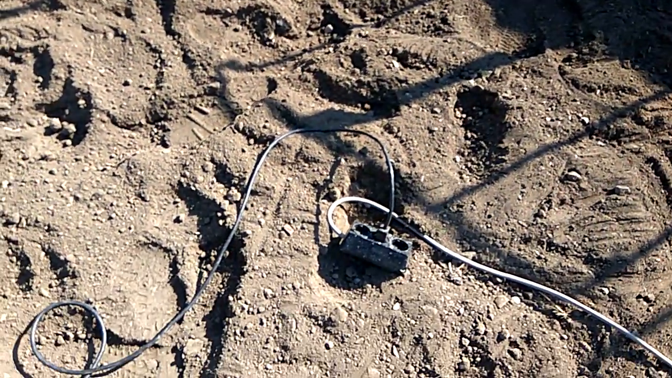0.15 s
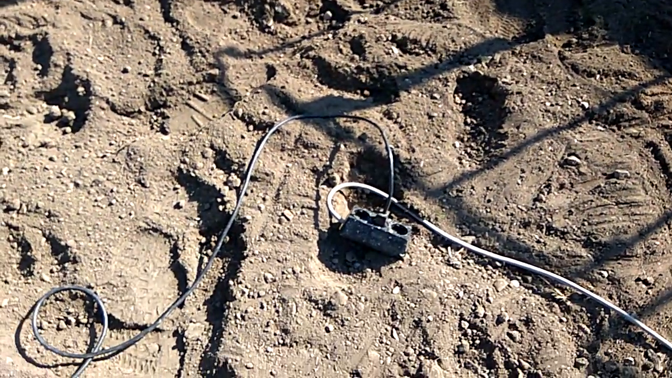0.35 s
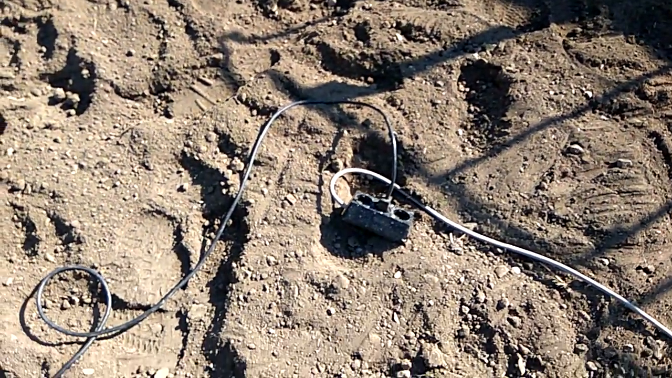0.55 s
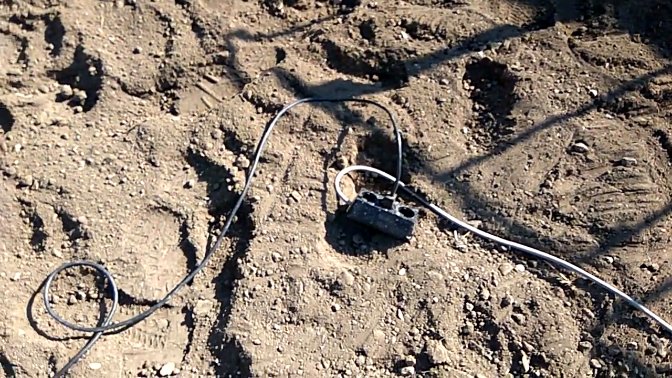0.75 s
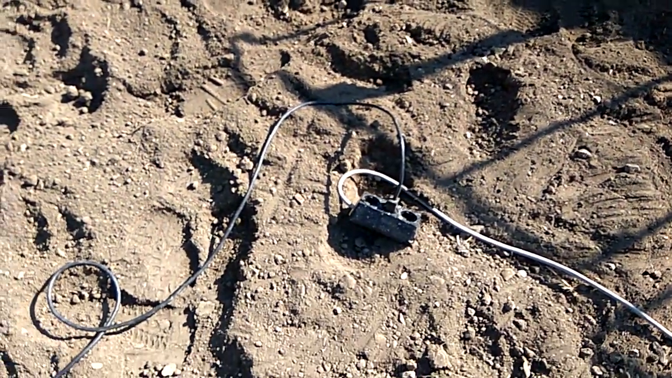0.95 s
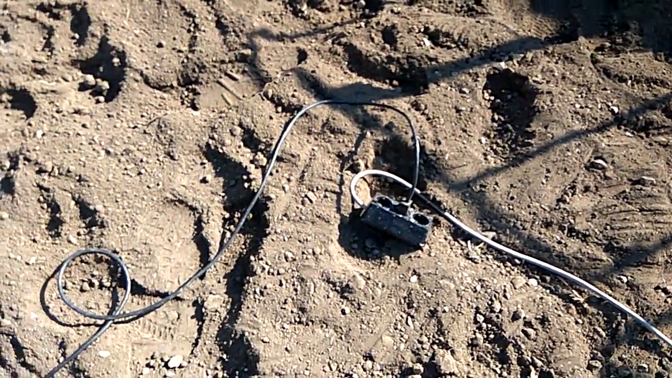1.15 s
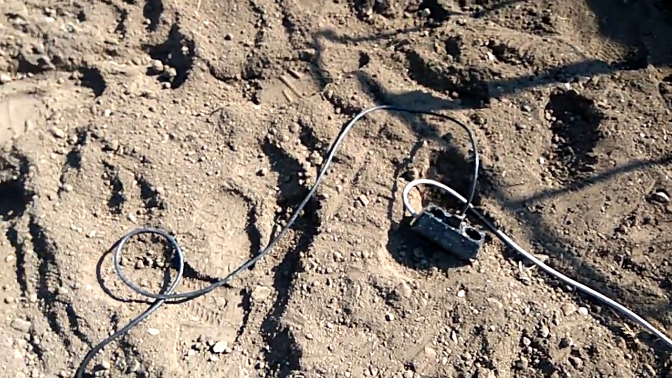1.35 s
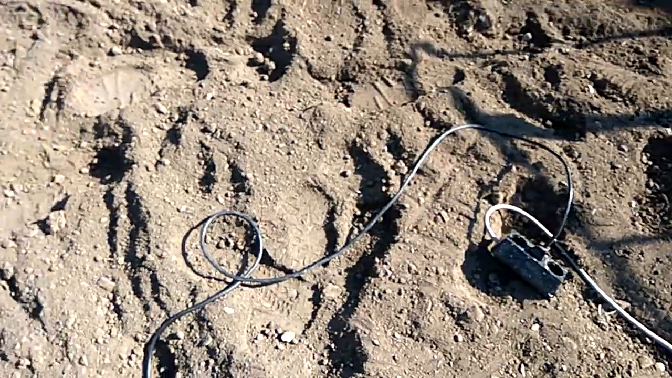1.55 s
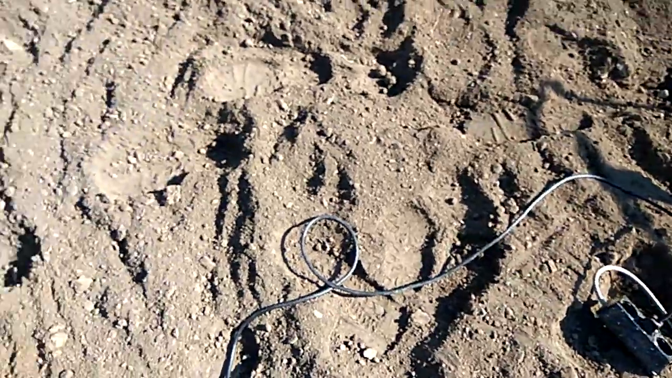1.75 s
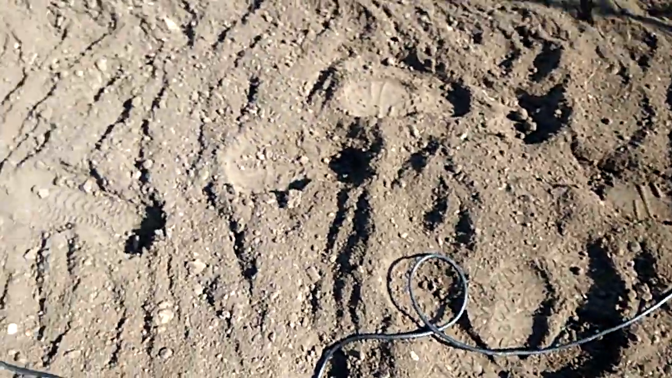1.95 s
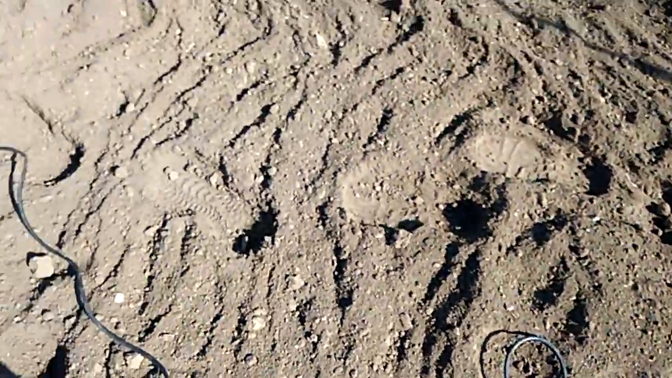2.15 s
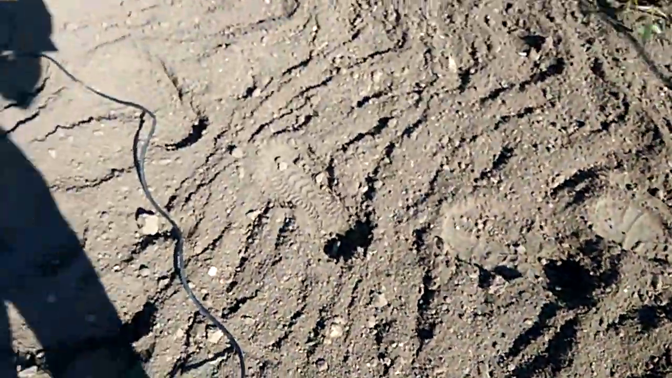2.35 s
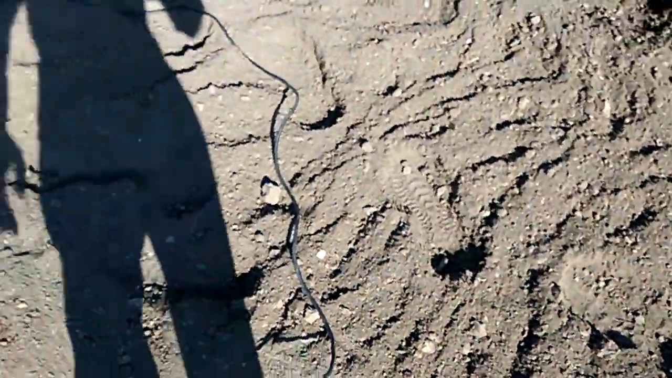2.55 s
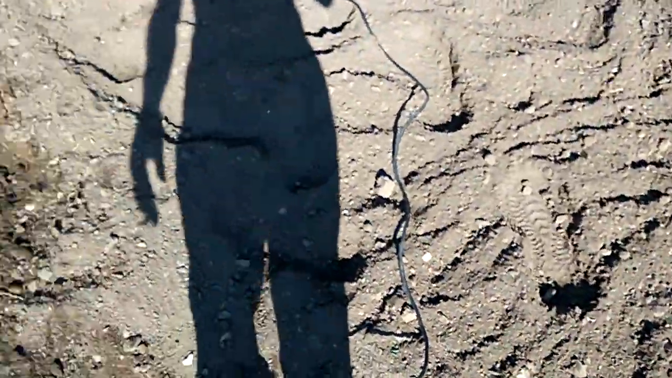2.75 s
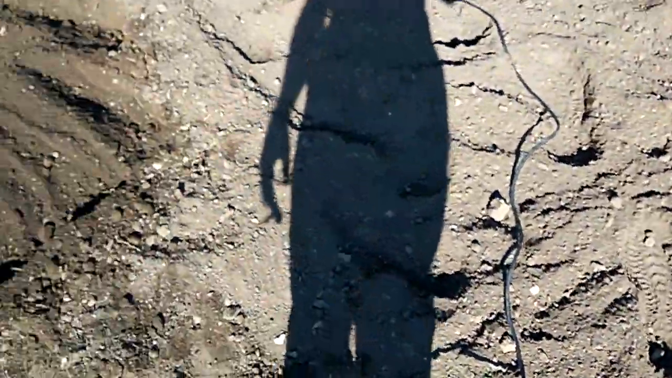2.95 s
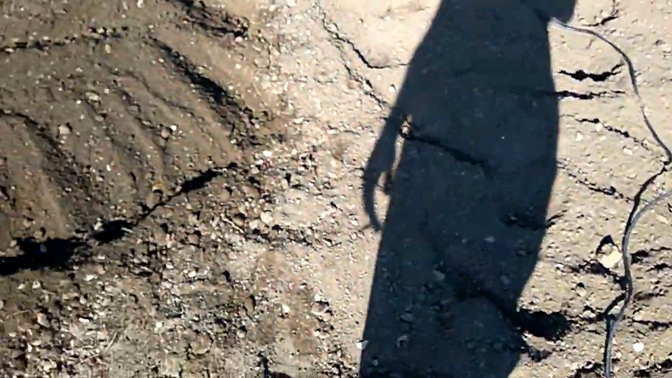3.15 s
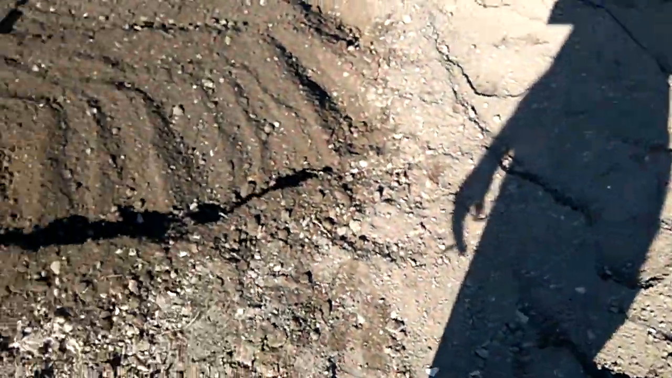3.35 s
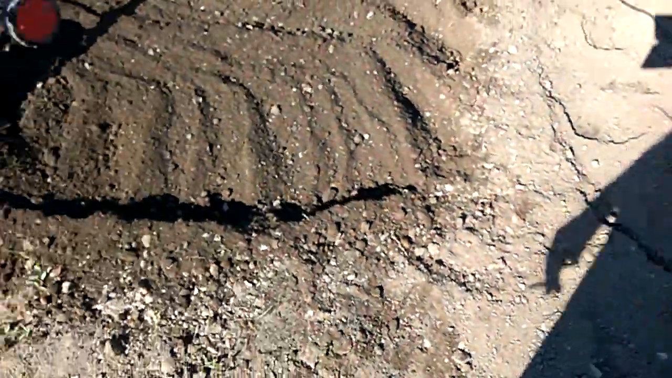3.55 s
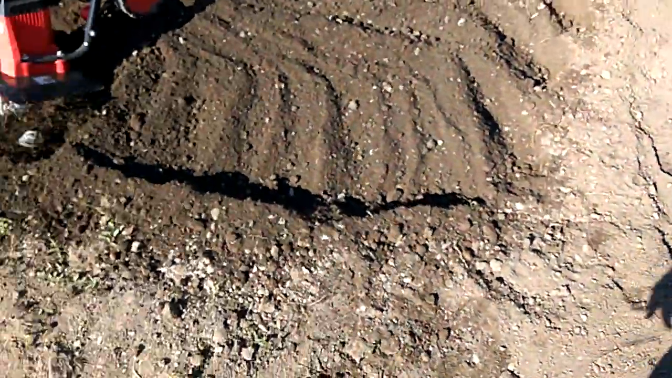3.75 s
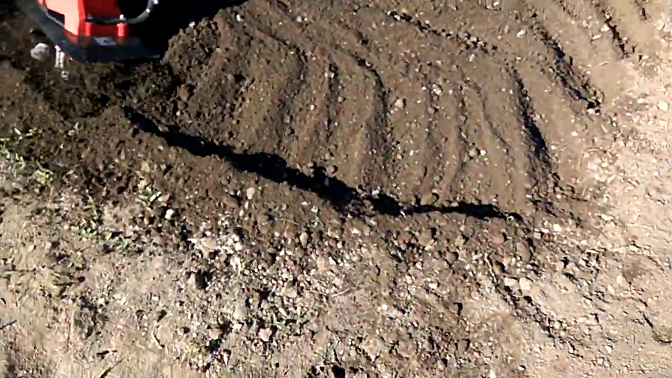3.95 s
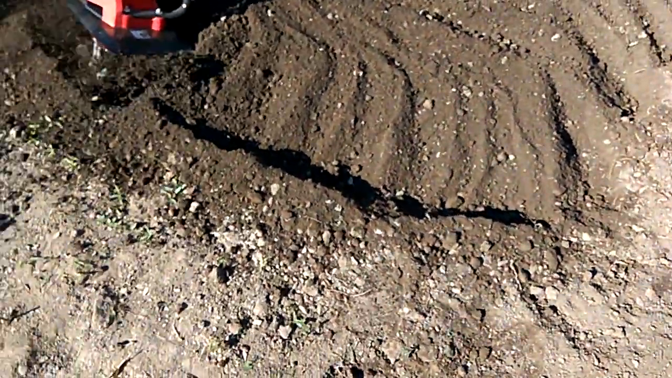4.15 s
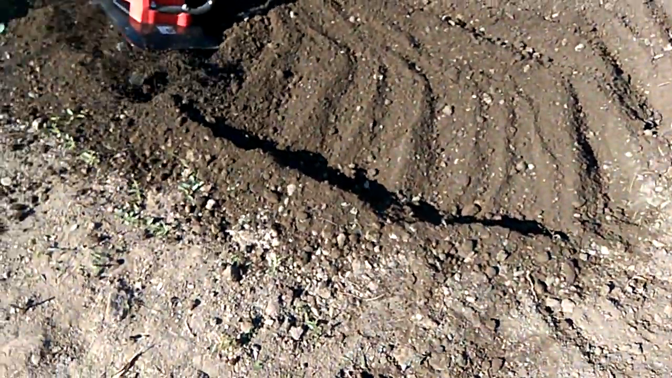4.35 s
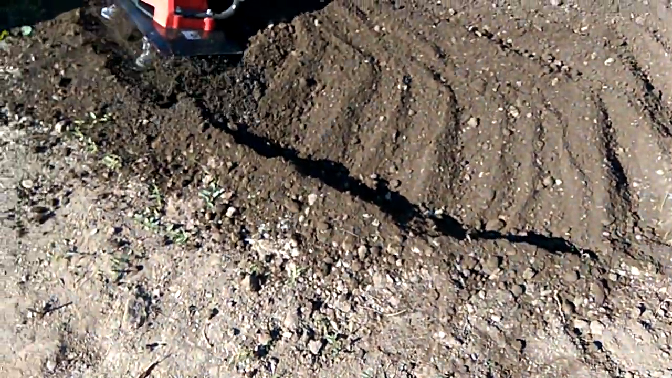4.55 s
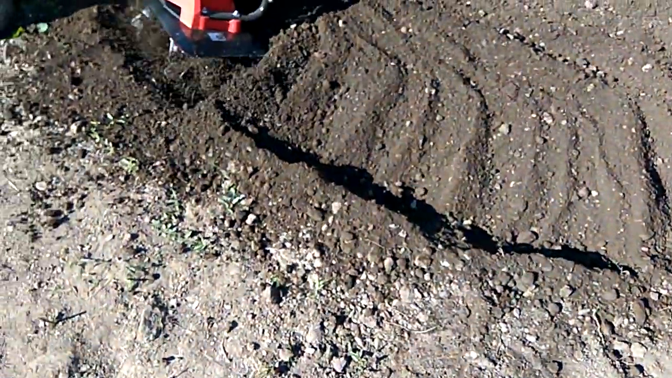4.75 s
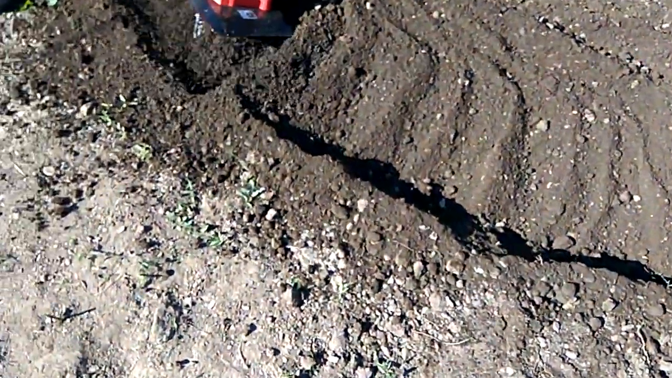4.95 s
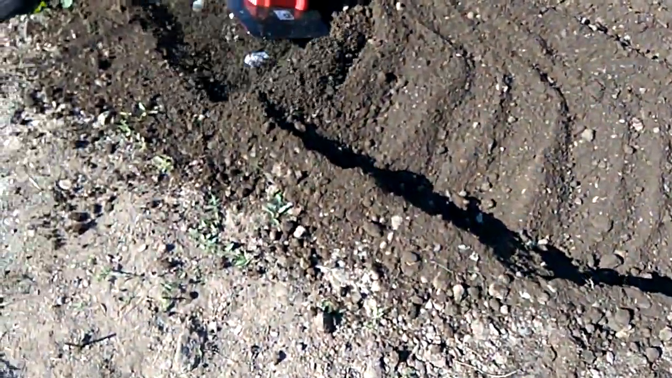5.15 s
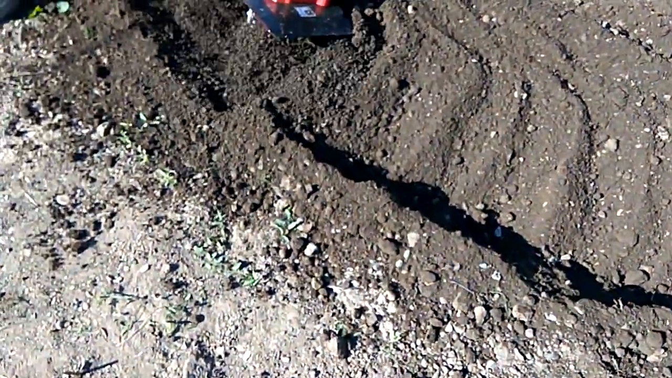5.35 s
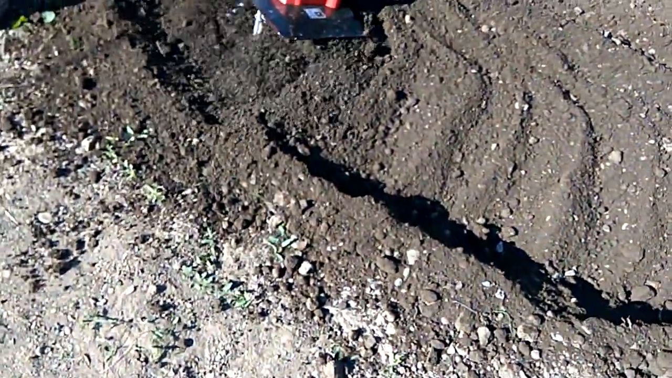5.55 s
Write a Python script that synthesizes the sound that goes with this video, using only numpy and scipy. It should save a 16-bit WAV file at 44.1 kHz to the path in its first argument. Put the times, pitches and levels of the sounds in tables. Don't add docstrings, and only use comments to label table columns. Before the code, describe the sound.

A small electric tiller whines high over a broad rush of air and churned soil, growing louder and fuller as the microphone turns toward it.

```python
import sys
import numpy as np
from scipy import signal
from scipy.fft import rfft, irfft
from scipy.io import wavfile
from scipy.ndimage import uniform_filter1d, map_coordinates

SR = 44100
rng = np.random.default_rng(int(sys.argv[2]) if len(sys.argv) > 2 else 0)


def waveform_to_disk(signal):
    frames = np.transpose(np.atleast_2d(signal))
    scaled = np.clip(frames, -1, 1) * 32767
    samples = np.round(scaled).astype(np.int16)
    wavfile.write(sys.argv[1], SR, samples)


def invert_db(level):
    return 10 ** (np.asarray(level, dtype=float) / 20)


N = 250488

WHEEL = 7 / 29
SIDES = np.array([[.5], [-.5]])
# (time [s], lag behind the right [ms], extra way round the hand [ms], echo level [dB])
PATHS = [(0, -.09, .1, -30), (1.4, -.06, .1, -30), (1.7, 0, .1, -25), (1.9, .24, .12, -6),
         (2.3, .28, .15, -1), (2.5, .33, .17, -1), (2.7, .372, .195, 1.5), (2.9, .39, .225, 2.5),
         (3.1, .375, .285, 5), (3.5, .33, .36, 9), (3.9, .24, .43, 8), (4.1, .21, .45, 6),
         (4.5, .175, .49, 5), (4.9, .15, .525, 3), (5.1, .12, .56, -3), (5.68, .07, .62, -8)]


def unit(x):
    return x / np.sqrt(np.mean(x ** 2) + 1e-20)


def along(points, hz):
    f, v = np.transpose(points)
    return np.interp(np.log(hz + 1), np.log(f + 1), v)


def curves(rows, t=None):
    s, *columns = np.transpose(rows)
    t = np.arange(N) / SR if t is None else t
    return [np.interp(t, s, column) for column in columns]


def wobble(rate, channels=2):
    knots = rng.standard_normal((channels, int(N * 200 / SR) + 9))
    return np.array([map_coordinates(k, [np.arange(N) * rate / SR]) for k in knots])


def patches(shape, size):
    field = uniform_filter1d(rng.standard_normal(shape), size=size[0], axis=-2)
    return unit(uniform_filter1d(field, size=size[1], axis=-1))


def coloured(spectrum, channels):
    hz = np.fft.rfftfreq(N, 1 / SR)
    white = rfft(rng.standard_normal((channels, N)))
    return unit(irfft(white * invert_db(along(spectrum, hz)), N))


def noise(channels):
    return signal.stft(rng.standard_normal((channels, N)), SR, nperseg=512, noverlap=384)


def sound(z):
    return signal.istft(z, SR, nperseg=512, noverlap=384)[1][:, :N]


def garden():
    # (frequency [Hz], level per Hz [dB])
    murmur_spectrum = [(25, -55), (34, -20), (45, -61), (120, -2), (220, 2.5), (320, 3), (450, -2),
                       (700, -3.5), (1100, -5), (1600, -120)]
    # (time [s], pitch [Hz], level [dB])
    engine = [(0, 46, -64), (.7, 44.2, -48), (1.47, 44.1, -44), (1.94, 46.4, -43.5), (2.88, 47.3, -56),
              (3.05, 47.2, -72), (3.27, 47, -43), (3.6, 45, -77), (5.68, 45.5, -93)]
    # (time [s], level [dB], length [s])
    gusts = [
        (.25, -49, 0.28),
        (0.849, -45, 0.21),
    ]
    t = np.arange(N) / SR

    common, *own = coloured(murmur_spectrum, channels=3)
    murmur = common + invert_db(-22) * np.array(own)
    swell_db = 1.5 * wobble(3, channels=1)

    pitch, hum_db = curves(engine)
    phase = 2 * np.pi * np.cumsum(pitch) / SR
    pull_s, rise_s, fade_db_per_s = 2.08, 0.044, 31
    pull = invert_db(-49.5 - fade_db_per_s * abs(t - pull_s)) * np.clip((t - pull_s) / rise_s, 0, 1)
    octave = invert_db(-59) + pull
    hum = invert_db(hum_db + SIDES * wobble(0.82, channels=1) * 1.3) * np.sin(phase) + octave * np.sin(2 * phase)

    wind = coloured([(25, -50), (34, -25), (44, 0), (80, -3), (160, -18), (400, -120)], channels=2)
    breeze = invert_db(-64)
    for s, db, length in gusts:
        breeze = breeze + invert_db(db) * np.exp(-((t - s) / length) ** 2)
    lumps = invert_db(1.3 * wobble(12)) * breeze
    return invert_db(-38.5 + swell_db) * murmur + np.sqrt(2) * hum + lumps * wind


def soil():
    # (time [s], peak level [dB], pitch [Hz])
    thuds = [
        (0.467, -17, 90),
        (2.641, -24, 90),
        (3.099, -16, 92),
        (3.323, -28, 90.6),
    ]
    # (time [s], peak level [dB], left-right difference [dB])
    stones = [
        (0.2209, -22, 9.0),
        (0.9916, -23, 21),
        (2.0986, -22, -8),
        (2.6349, -9, 10),
        (3.0325, -11, 2),
        (3.271, -18, 4),
        (3.3014, -23, 1.5),
        (4.2911, -17, 2.5),
        (4.471, -23, 1.0),
        (4.6078, -20, -19),
    ]
    out, t = np.zeros((2, N + SR)), np.arange(SR // 10) / SR
    for s, db, hz in thuds:
        push = np.sin(2 * np.pi * hz * t) + 0.87 * np.sin(2 * np.pi * 2.3 * hz * t)
        onset = 1 - np.exp(-t / 0.0057)
        out[:, round(s * SR):][:, :len(t)] += invert_db(db - 60 * t / 0.034) * push * onset
    for s, db, pan_db in stones:
        tick = np.diff(rng.standard_normal(len(t) + 1)) * invert_db(-60 * t / 0.027)
        out[:, round(s * SR):][:, :len(t)] += invert_db(db - 15 + SIDES * pan_db) * tick
    return out[:, :N]


def facing(t):
    # (time [s], level [dB])
    roar_level = [(0, -20), (.5, -21), (1, -21.5), (1.4, -22.5), (1.7, -21), (1.9, -19), (2.1, -20.5),
                  (2.3, -18.5), (2.6, -16.5), (2.8, -17), (3.2, -13), (3.5, -13), (3.8, -14), (4.1, -14),
                  (4.5, -14), (4.8, -13.5), (5.1, -13.5), (5.68, -13.5)]
    swing_s, swing_spread_s, away_before, away_after = 2.01, 0.26, 1, 0.25
    shade_s, shade_in_s, shade_out_s, shade_db = 1.887, 0.34, 0.24, -6.5
    clear_before_db, clear_after_db = 0.5, -0.5
    turned = 1 / (1 + np.exp((swing_s - t) / swing_spread_s))
    away = away_before + (away_after - away_before) * turned
    hidden = np.exp(-((t - shade_s) / np.where(t < shade_s, shade_in_s, shade_out_s)) ** 2)
    clear_db = clear_before_db + (clear_after_db - clear_before_db) * turned
    return curves(roar_level, t)[0], away, clear_db + shade_db * hidden


def hand(hz, echo, echo_db):
    octaves = np.log2((hz + 1) * echo / 1000)
    return invert_db(echo_db) * np.exp(-.5 * (octaves / .6) ** 2)


def shaft_speed():
    # (time [s], speed [turns/s])
    spin = [(0, 363), (.24, 365.5), (.66, 363), (1.02, 359.2), (1.34, 358), (1.5, 355.9), (1.92, 355.5),
            (2.23, 352.9), (2.59, 355.6), (2.79, 358), (2.92, 358.5), (3.1, 371.3), (3.47, 368.3),
            (3.94, 364.3), (4.19, 365.3), (4.72, 364), (5.25, 357.9), (5.68, 357.3)]
    # (time [s], drag [turns/s])
    bites = [(.14, 2.5), (.33, 3.5), (.53, 5), (.77, 1.5), (.87, 1.5), (1.08, 1.3), (1.25, 1.6), (1.43, .8),
             (1.77, 1), (2.14, 1.5), (2.32, 1.5), (2.67, 4.5), (3.24, 3), (3.36, 3.5), (3.58, 5), (3.81, 5),
             (4.06, 6), (4.3, 8), (4.58, 7.5), (4.83, 4), (5.03, 2), (5.34, 1.6), (5.56, 1.2)]
    t = np.arange(N) / SR
    speed = curves(spin)[0]
    for s, drag in bites:
        length_s = .14 + .017 * drag
        speed = speed - drag * np.cos(np.pi * np.clip((t - s) / length_s, -.5, .5)) ** 2
    return speed


def roar():
    # (frequency [Hz], level per Hz [dB])
    rush = [(300, -24.5), (800, -5.5), (1150, -1), (1600, -3), (2500, 4), (3300, 1.5), (5500, -2),
            (7600, -4.5), (8700, -10), (10500, -15.5), (12200, -19.5), (14000, -11), (15600, -18)]
    # (frequency [Hz], gain [dB])
    away_left = [(400, 0), (900, -14), (1500, 7.5), (2300, -5), (5200, -0.5), (6300, 0), (10000, 4),
                 (15000, -3)]
    # (frequency [Hz], gain [dB])
    away_right = [(400, 3), (900, -7), (1300, -2.5), (2300, -10.5), (4600, -5), (6500, -8), (8200, -9),
                  (11000, -30), (15000, -23)]
    # (frequency [Hz], level [dB])
    scatter = [(300, -26), (1000, -17), (2000, -16), (3400, -22), (5000, -16), (7000, -13), (9000, -10),
               (15000, -9)]
    # (frequency [Hz], gain [dB])
    left_port = [(500, 2.26), (1500, 0.98), (3000, 1.5), (6000, 2.5), (8500, -0.7), (11500, 2.5),
                 (14500, -2)]
    # (frequency [Hz], time [s])
    looms = [(3300, 4.85), (3800, 4.7), (6000, 3.8)]
    # (frequency [Hz], width [Hz], depth facing away [dB], depth facing [dB])
    hollows = [
        (5700, 200, -15, 0),
        (8080, 230, 0, -16),
    ]

    hz, t, z = noise(channels=3)
    level_db, away, shade_db = facing(t)
    lag, echo, echo_db = curves(PATHS, t)
    f = hz[:, None]

    def late(ms):
        return np.exp(-2j * np.pi * f * ms / 1000)

    bounce = hand(f, echo, echo_db)
    left = late(lag) * (1 - bounce * late(echo)) / (1 + 1.28 * bounce)
    left_gain = invert_db((2.5 - away) * along(left_port, f))
    direct = z[0] * np.array([left * left_gain, np.ones_like(left)])
    direct = direct * np.exp(.2j * np.sqrt(f / 4000) * patches(direct.shape, size=(6, 40)))
    close = np.clip(4 * (t - along(looms, f)) + .5, 0, 1)
    loose = invert_db(along(scatter, f) + 21.1 * away + 10 * close)
    both = (direct + loose * z[1:]) / np.sqrt(1 + loose ** 2)

    turned = away * np.array([along(away_left, f), along(away_right, f)])
    shade = shade_db * np.clip(np.log2((f + 1) / 1200) / 0.68, 0, 1.2)
    for centre_hz, width, back_db, front_db in hollows:
        depth_db = back_db * away + front_db * (1 - away)
        shade = shade + depth_db * np.exp(-((f - centre_hz) / width) ** 2)
    flurries = 1.45 * patches(left.shape, size=(5, 20))
    fringes = .9 * patches(direct.shape, size=(2, 90))
    gain = invert_db(level_db + turned + shade + flurries + fringes) * unit(invert_db(along(rush, f)))

    churn = invert_db(0.3 * wobble(8, channels=1) + 0.4 * wobble(30, channels=1))
    throb = 1 + 0.021 * np.cos(2 * np.pi * WHEEL * np.cumsum(shaft_speed()) / SR)
    return sound(both * gain) * churn * throb


def whine():
    # (time [s], level [dB], left-right difference [dB])
    mesh = [(0, -25.5, 5), (.2, -28.5, -1), (.4, -26.5, 4), (.65, -30, 5.5), (1, -27, 10), (1.15, -35, 9),
            (1.49, -24.5, 23), (1.7, -39.5, -20), (1.9, -23.5, 13), (2.49, -16, 6), (2.99, -27.5, 9),
            (3.25, -25.5, -1), (3.7, -24.5, -1), (4.1, -22.5, 0), (4.5, -23, 5), (4.95, -18.5, -4),
            (5.3, -20, -7.5), (5.68, -16, -20)]
    # (time [s], level over the roar [dB])
    shrill = [(.25, -22), (.8, -12), (1.5, -11), (1.95, -26), (2.6, -22), (2.96, -27), (3.3, -17),
              (4.65, -21), (5.05, -14)]
    # (level over the roar [dB], gain per strain [dB per turn/s], gain facing away [dB], share of the shade)
    tones = [
        (-15, 0, -3, 0),
        (-18.5, .4, -1, .3),
        (-14.5, .4, -2, .5),
        (-23, .8, -5, .7),
    ]
    # (multiple of the shaft, level over the roar [dB])
    minor = [(2, -28.5), (3, -25), (8, -23.5), (9, -21.5), (22, -53), (28, -28.5)]

    speed, t = shaft_speed(), np.arange(N) / SR
    speed = speed + .25 * (speed - uniform_filter1d(speed, size=SR // 4))
    steady = uniform_filter1d(speed, size=SR // 4)
    load = speed - steady
    level_db, away, shade_db = facing(t)
    lag, echo, echo_db = curves(PATHS)
    turns = np.cumsum(speed) / SR - np.array([[1], [0]]) * speed * lag / 1000

    mesh_db, mesh_pan = curves(mesh)
    near_db = level_db + 2 * np.clip(t - 4, 0, None)
    strain = 360 - steady
    upper, lower, second, fan = [near_db + db + per_strain * strain + back * away + hid * shade_db
                                 for db, per_strain, back, hid in tones]
    casing_hz, casing_width_hz = 357.2, 5
    shaft = -37 - 10 * np.log10(1 + (2 * (steady - casing_hz) / casing_width_hz) ** 2)
    third = level_db + curves(shrill)[0]
    third_pan = 18 * away + 2.7 * shade_db
    fan_pan = 12 * away + 1.5 * shade_db

    def tone(order, db, pan_db, flutter_db, blur, drift=None):
        jitter = blur * wobble(45, channels=1)
        if drift is None:
            drift = .45 * wobble(5.6) + rng.uniform(0, 2 * np.pi)
        hz = order * speed
        bounce = hand(hz, echo, echo_db) * np.exp(-2j * np.pi * hz * echo / 1000)
        echo_phase = np.array([[1], [0]]) * np.angle(1 - bounce)
        share = invert_db(SIDES * pan_db) / np.sqrt(np.cosh(pan_db * np.log(10) / 20))
        level = np.sqrt(2) * invert_db(db + flutter_db * wobble(22)) * share
        return level * np.sin(2 * np.pi * order * turns + jitter + drift + echo_phase)

    family = .2 * wobble(30, channels=1) + .2 * wobble(6)
    out = tone(order=1, db=shaft + 0.65, pan_db=0.8, flutter_db=2.0, blur=0.15)
    out += tone(order=7, db=mesh_db + .85 * load + .7, pan_db=mesh_pan, flutter_db=1.8, blur=.12, drift=family)
    for step, db in [(1, upper), (-1, lower), (2, upper - 7), (-2, lower - 6)]:
        out += tone(order=7 + step * WHEEL, db=db, pan_db=.7 * mesh_pan, flutter_db=2.2, blur=.3, drift=family)
    for step, db in [(0, -6), (-1, -4.5), (-2, -10), (1, -5.5)]:
        out += tone(order=14 + step * WHEEL, db=second + db, pan_db=.4 * third_pan, flutter_db=1.8, blur=.4)
    out += tone(order=21, db=third, pan_db=third_pan, flutter_db=2.5, blur=.3)
    out += tone(order=38, db=fan - 2, pan_db=fan_pan, flutter_db=3.5, blur=.6)
    for multiple, db in minor:
        out += tone(order=round(multiple), db=level_db + db, pan_db=0.82 * third_pan, flutter_db=4.0, blur=0.44)
    return out


def scene():
    return garden() + soil() + roar() + whine()


def top_cut(x):
    return signal.sosfilt(signal.butter(12, 15960, fs=SR, output="sos"), x)


def record(dry):
    cut = signal.sosfilt(signal.butter(4, 37, "high", fs=SR, output="sos"), dry)
    soft = cut / (1 + np.abs(cut / .85) ** 6) ** (1 / 6)
    return top_cut(soft)


dry = scene()
out = record(dry)
waveform_to_disk(out)
```